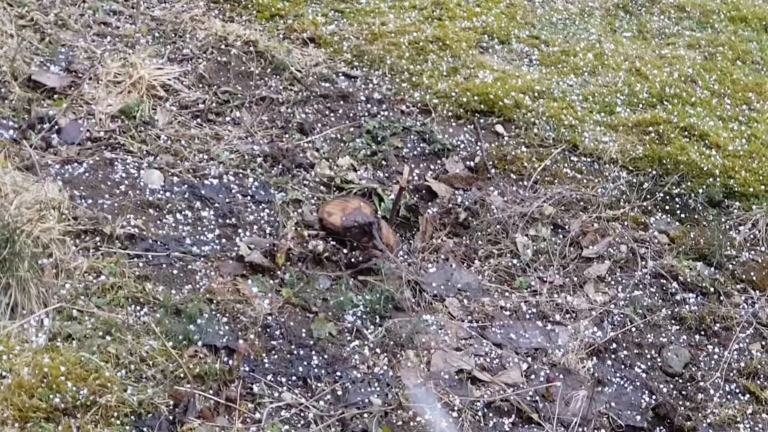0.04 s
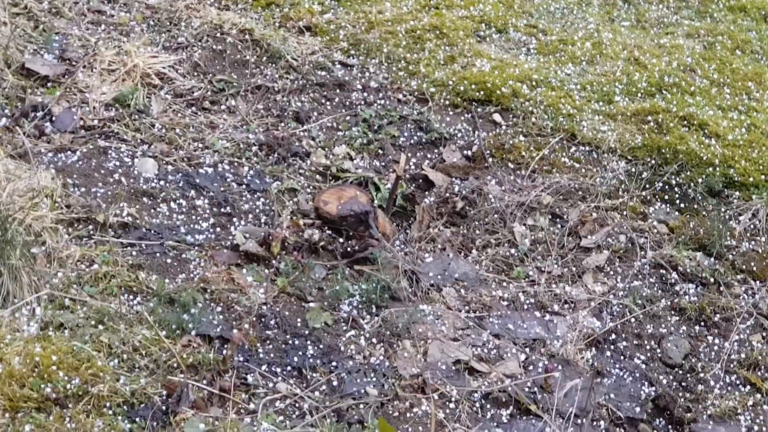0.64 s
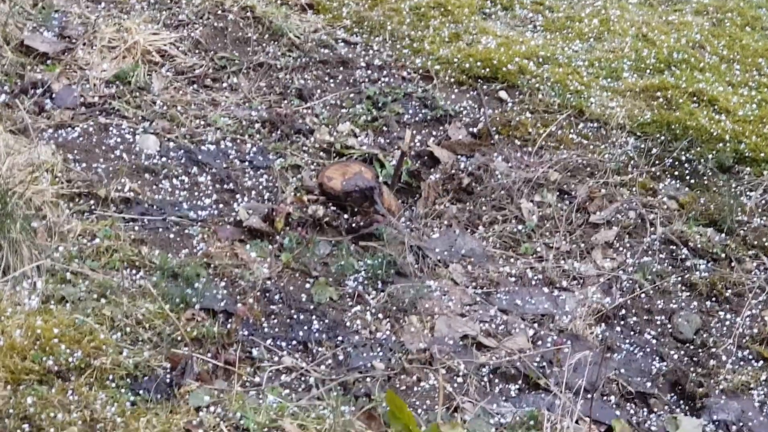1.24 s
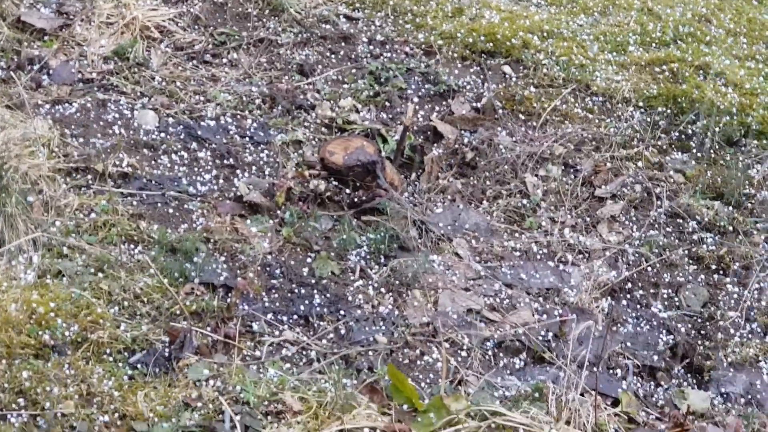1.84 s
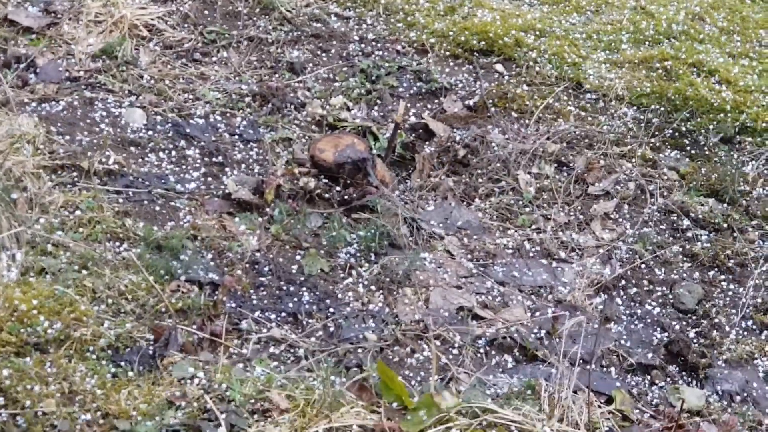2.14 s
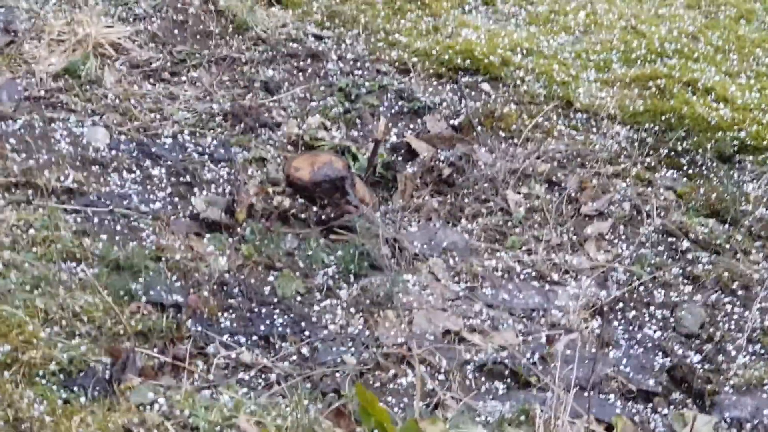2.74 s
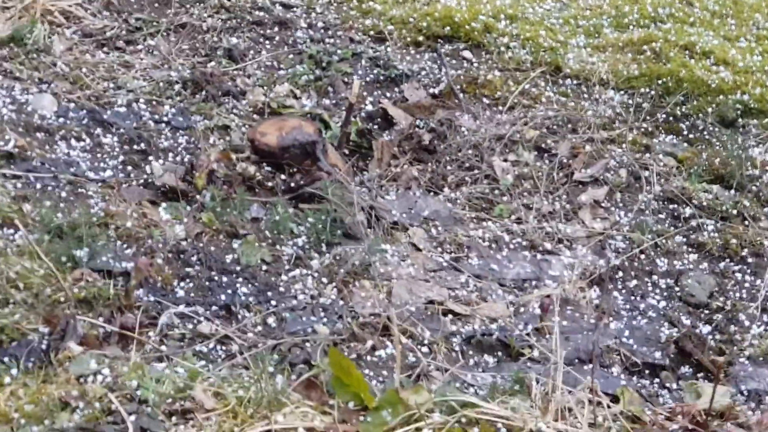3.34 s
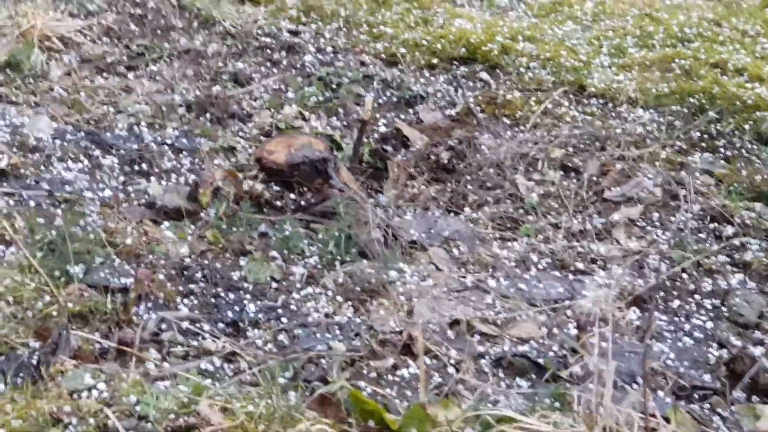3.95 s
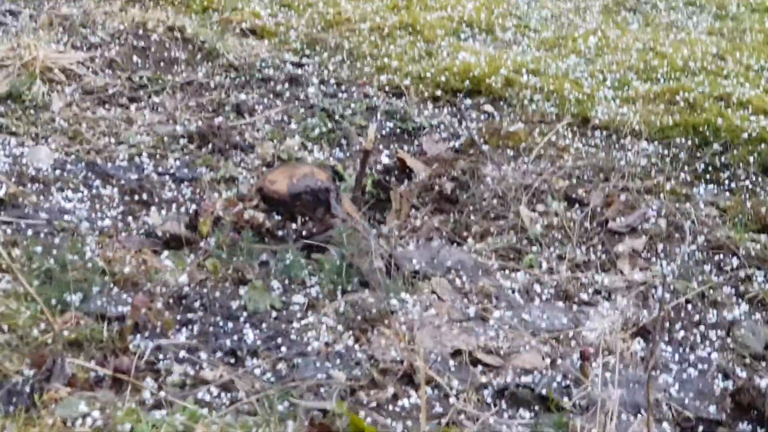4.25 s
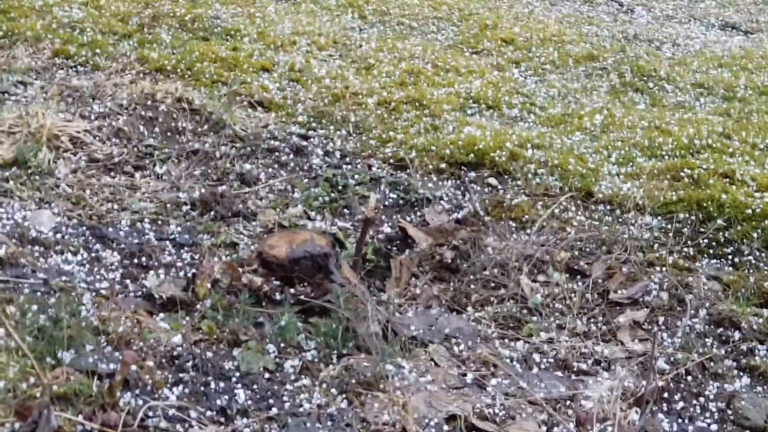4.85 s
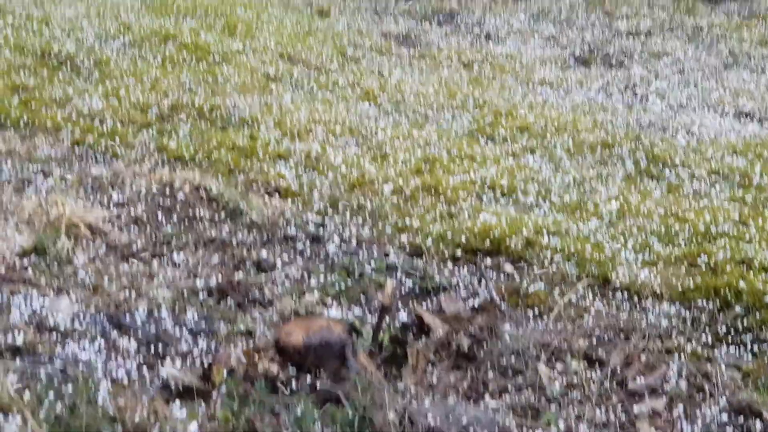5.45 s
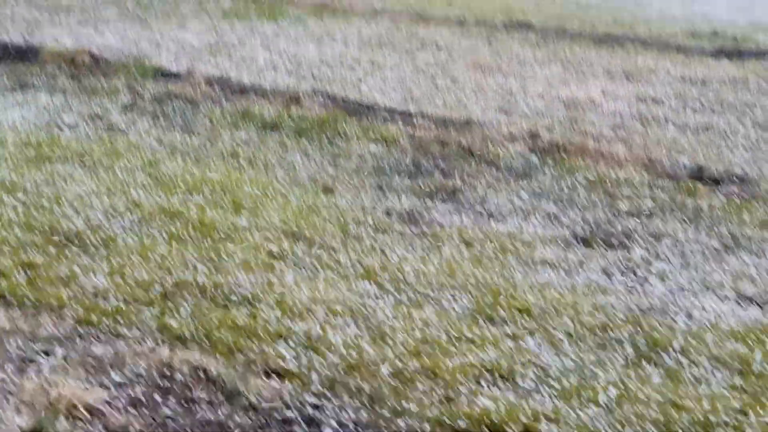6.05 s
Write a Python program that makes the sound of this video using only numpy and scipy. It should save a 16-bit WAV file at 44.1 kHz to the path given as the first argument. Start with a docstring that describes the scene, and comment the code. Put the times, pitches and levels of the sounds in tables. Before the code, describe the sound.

Small hard ice pellets fall outdoors on grass, dead leaves and soil, heard from a hand-held microphone. Nearby ones land with short dry taps and thin high ticks, while distant ones merge into a hiss over a soft, even background wash. The patter starts light, then swells from about 0.8 seconds, with many sharp close hits in surges until 3 seconds. A short low gust rumbles on the microphone around 1.7 seconds. From 3 to about 3.7 seconds a strong gust, the loudest event, buffets the microphone with fluttering, crackling puffs, peaking near 3.3 seconds. A few dry leaves scrape briefly within it, and the patter drops back. A smaller slap of wind follows just after 4 seconds. From about 4.4 seconds the pellets pick up again and keep tapping to the end, with mild wind rumble around 5.5 and 6 seconds.

```python
"""Graupel falls in surges on grass, dead leaves and soil around a hand-held camera.
Each pellet lands with a short dry tap, thuds into the ground, crumbles and hops; the distant ones
merge into a hiss over a soft wash of far surroundings. Gusts buffet the two microphone ports, the
biggest flicks dry leaves over, and the camera's gain control ducks the mix under the strongest."""
import sys
import numpy as np
from scipy import signal
from scipy.fft import rfft, irfft, next_fast_len
from scipy.io import wavfile
from scipy.ndimage import map_coordinates

SR = 44100
rng = np.random.default_rng(int(sys.argv[2]) if len(sys.argv) > 2 else 0)


def digitize_waveform(pressure):
    """Quantize a signal to 16-bit integers and store it at the path in sys.argv[1].

    Rows of a 2-D input are taken as channels; values are limited to [-1, 1].
    """
    field = np.atleast_2d(pressure).T
    bounded = np.clip(field, -1, 1)
    quanta = np.round(bounded * 32767).astype(np.int16)
    wavfile.write(sys.argv[1], SR, quanta)


N = 273861

# Tone of the far surroundings: f/Hz, level/dB
FAR_COLOUR = [(50, -1.5), (400, -3.5), (2100, -3), (2900, -10.5), (4500, -8), (9000, -17), (15000, -11)]
# Dry leaves flicked over by the big gust: t/s, level/dB
LEAF_FLICKS = [(3.301, -25), (3.377, -20.5), (3.425, -22.5), (3.679, -23.5)]
# Tone of their scraping: f/Hz, level/dB
LEAF_COLOUR = [(500, 14.5), (1400, 10.0), (2600, 5.0), (4500, -4.0), (9000, -19.5)]

# Gusts on the ports: peak t/s, rise/s, fall/s, buffet level/dB, flutter level/dB, left over right/dB
GUSTS = [(1.22, 0.19, 0.44, -33, -45.5, -6), (1.71, 0.11, 0.079, -18, -32, 9.5),
         (3.135, 0.091, 0.38, -25, -18, 0), (3.312, 0.079, 0.3, -28, -12, 3.5),
         (4.058, 0.076, 0.097, -39, -23.5, 4), (4.25, 0.041, 0.22, -33.5, -27, 1),
         (5.46, 0.088, 0.37, -32.5, -31.5, 6.5), (6.05, 0.096, 0.43, -36, -38, 4)]
# Separate puffs in and after the big gust: t/s, level/dB
PUFFS = [(3.042, -17), (3.14, -13), (3.183, -13), (3.209, -11), (3.266, -9.5), (3.303, -1.5), (3.346, -5),
         (3.426, -11), (3.475, -9), (3.505, -12), (3.564, -13), (3.635, -7.5), (3.665, -11), (3.936, -20),
         (4.074, -17), (4.217, -19), (4.405, -21)]
# Sharp slaps of wind: t/s, level/dB, f/Hz
SLAPS = [(1.5365, -16.5, 115), (3.295, -5, 537), (3.308, -9, 313), (4.073, -14.5, 645)]
# Tone of the deep eddies, the quick ones and their crackle: f/Hz, level/dB
BUFFET_COLOUR = [(20, -47), (45, -11), (80, -1.5), (140, -2), (220, -9), (400, -53), (900, -57),
                 (2500, -75)]
FLUTTER_COLOUR = [(30, -26), (100, -9), (200, -1.5), (290, 3), (450, -5.5), (700, -14.5), (1200, -40),
                  (4000, -88)]
CRACKLE_COLOUR = [(300, 7.0), (800, 5.5), (2000, -7.0), (3000, -19.5), (6000, -29.5)]

# Strength of the shower, before and after the big gust: t/s, level/dB
SHOWER_BEFORE = [(0.0, -44.5), (0.64, -47), (0.78, -41.5), (1.05, -36.5), (1.25, -34), (1.44, -37.5),
                 (1.86, -38), (1.97, -34), (2.07, -35), (2.15, -40), (2.28, -37.5), (2.42, -34.5),
                 (2.54, -35.5), (2.95, -41.5)]
SHOWER_AFTER = [(3.55, -45), (4.3, -43), (4.38, -35.5), (4.47, -38.5), (5.13, -38.5), (5.43, -41.5),
                (5.65, -38), (5.86, -37.5), (6.01, -37.5), (6.04, -43), (6.21, -37.5)]
# Tone of the distant lawn and of a crumbling pellet: f/Hz, level/dB
HISS_COLOUR = [(30, -24), (85, -40), (250, -12.5), (750, 0.5), (1300, -1.5), (2000, -3.5), (2900, -3.5),
               (4200, -3.5), (7200, -7.5), (9000, -14), (12500, -8.5), (15000, -11)]
CRUNCH_COLOUR = [(100, -11), (400, -8), (2000, -19), (3000, 5), (4500, 2), (7200, 23.5), (9000, 13),
                 (12500, 18), (16000, -79)]
# EQ on the scattered patter and on the close hits: f/Hz, level/dB
PATTER_EQ = [(60, -3), (400, -1), (750, 1), (1300, -6.5), (2000, -1.5), (2900, -3.5), (4400, 5.5),
             (7300, 6), (8800, -8), (10300, -5.5), (12300, -0.5), (15800, -10.5)]
NEAR_EQ = [(80, -9), (300, 1), (700, -4.5)]
# Light pellets ticking on stiff blades close by: t/s, level/dB, f/Hz
BLADE_TICKS = [(1.1012, -7, 12500), (1.2677, -15, 12600), (1.3738, -18, 12500), (2.3645, -9, 12000),
               (4.5206, -15, 12140), (5.5633, -15, 15100)]
# The loudest pellets landing close by: t/s, level/dB, f/Hz
NEAR_PELLETS = [(0.0407, -21, 1360), (0.1485, -21, 4200), (0.7803, -15, 1190), (0.8856, -5, 1620),
                (0.9195, -10, 1620), (0.9416, -14, 1530), (1.0037, -6, 1870), (1.0105, -13, 1960),
                (1.088, -4, 2800), (1.1395, -9, 2210), (1.1585, -11, 1780), (1.245, -6, 2120),
                (1.2502, -9, 2700), (1.2812, -9, 1280), (1.3169, -11, 2040), (1.3274, -13, 1440),
                (1.3861, -13, 2700), (1.5018, -15, 1780), (1.5839, -10, 1360), (1.6603, -13, 1440),
                (1.7871, -7, 1780), (1.8028, -12, 1960), (1.8723, -11, 4400), (2.0036, -13, 1530),
                (2.0451, -9, 1280), (2.0556, -13, 1620), (2.0789, -11, 1960), (2.0855, -8, 3600),
                (2.2991, -13, 1530), (2.3346, -15, 1190), (2.3671, -10, 1960), (2.3987, -9, 1620),
                (2.4173, -11, 1870), (2.443, -9, 2800), (2.4481, -10, 3400), (2.4592, -10, 1620),
                (2.5083, -11, 2040), (2.5717, -13, 2040), (2.6143, -9, 1440), (2.6198, -11, 2120),
                (2.7934, -13, 1360), (2.8761, -14, 2700), (2.8855, -5, 2120), (2.9669, -16, 2120),
                (4.1796, -16, 1870), (4.4033, -13, 1780), (4.5693, -13, 3100), (4.5839, -12, 2700),
                (4.6805, -8, 2800), (4.6845, -7, 3600), (4.8345, -15, 600), (4.8607, -14, 1530),
                (4.9293, -11, 1440), (4.9794, -9, 2800), (5.024, -11, 2120), (5.109, -10, 2120),
                (5.1964, -10, 2120), (5.2534, -15, 1530), (5.6435, -13, 1700), (5.6914, -10, 1870),
                (5.7269, -13, 3000), (5.8215, -12, 2700), (5.8613, -16, 1020), (5.9435, -9, 4000),
                (5.9869, -14, 2040), (6.0111, -13, 3000)]


def amp(db):
    """Decibels to gain."""
    return 10 ** (np.asarray(db) / 20)


def unit(x):
    """Scale to rms 1."""
    return x / np.sqrt(np.mean(x ** 2) + 1e-20)


def curve(rows):
    """One value per sample from rows of t/s, value."""
    return np.interp(np.arange(N) / SR, *np.transpose(rows))


def bell(peak_s, width_s):
    """A bell-shaped swell, down to 1/e at width_s either side of its peak."""
    return np.exp(-((np.arange(N) / SR - peak_s) / width_s) ** 2)


def wobble(rate):
    """A smooth random curve, rate knots a second."""
    return map_coordinates(rng.standard_normal(4096), [np.arange(N) * rate / SR], mode="wrap")


def filtered(x, response):
    """Filter x by a gain given as a function of frequency."""
    padded = next_fast_len(N + SR // 4)
    return irfft(rfft(x, padded) * response(np.fft.rfftfreq(padded, 1 / SR)), padded)[..., :N]


def coloured(x, points):
    """EQ x through points of f/Hz, level/dB, joined on a log axis."""
    f, db = np.transpose(points)
    return filtered(x, lambda hz: amp(np.interp(np.log(hz + 1), np.log(f), db)))


def rush(colour, shared):
    """Stereo noise of rms 1; a share of its power is common to both ports."""
    noise = rng.standard_normal((3, N))
    return unit(coloured(np.sqrt(1 - shared) * noise[:2] + np.sqrt(shared) * noise[2], colour))


def lumps(rate, depth_db):
    """Quick random swells, half shared by the ports and half their own; rms 1."""
    swell = wobble(rate) + np.array([wobble(rate), wobble(rate)])
    return unit(amp(depth_db * np.minimum(swell, 1.6)))


def taps(s, size, hz, lead_ms, life, pan_db=0):
    """Impacts at times s: pressure swings that build for `life` cycles and die, left lead_ms early."""
    step = np.arange(int(6 * np.max(life / hz) * SR) + 2)
    ports = []
    for side in (-1, 1):
        start = (s + side * lead_ms / 2000) * SR
        index = np.ceil(start).astype(int)[:, None] + step
        cycles = hz[:, None] * (index - start[:, None]) / SR
        age = cycles / life
        swing = -np.sin(2 * np.pi * cycles) * (age * np.exp(1 - age)) ** 2
        gain = size * amp(-side * pan_db / 2)
        pressure = gain[:, None] * swing
        ports.append(np.bincount(np.clip(index, 0, N).ravel(), pressure.ravel(), N + 1)[:N])
    return np.array(ports)


def far_wash():
    """The bed: a soft, even rush of the surroundings."""
    return amp(-42.5) * rush(FAR_COLOUR, shared=0.26)


def leaves():
    """Each flick of a dry leaf is a short swell of grainy scraping."""
    swell = sum(amp(db) * bell(s, width_s=0.015) for s, db in LEAF_FLICKS)
    grain = lumps(rate=500, depth_db=3)
    return swell * grain * rush(LEAF_COLOUR, shared=0.61)


def gusts():
    """Envelopes of deep and quick eddies, and their pan in dB: gusts swell and die over a breeze."""
    deep, quick = amp(-51.5) ** 2, amp(-56) ** 2  # power of the breeze
    lean = 0
    for s, rise, fall, deep_db, quick_db, left_db in GUSTS:
        age = np.arange(N) / SR - s
        power = np.exp(-np.where(age < 0, (age / rise) ** 2, 2 * age / fall))
        deep += amp(deep_db) ** 2 * power
        quick += amp(quick_db) ** 2 * power
        lean += left_db * (amp(deep_db) ** 2 + amp(quick_db) ** 2) * power
    return np.sqrt(deep), np.sqrt(quick), lean / (deep + quick)


def wind():
    """Eddies hit each port in lumps: deep buffeting, quick flutter, puffs and a few sharp slaps."""
    deep, quick, left_db = gusts()
    buffet = deep * lumps(rate=29, depth_db=2.8) * rush(BUFFET_COLOUR, shared=0.36)
    puffs = sum(amp(db - 1.5) * bell(s, width_s=0.00976) for s, db in PUFFS)
    eddies = np.hypot(quick * lumps(rate=65, depth_db=2.2), puffs)
    flutter = eddies * rush(FLUTTER_COLOUR, shared=0.38)
    bursts = lumps(rate=120, depth_db=2.2)  # eddies break up at the port's edge
    crackle = amp(-11.5) * bursts * eddies * rush(CRACKLE_COLOUR, shared=0.25)
    s, db, hz = np.transpose(SLAPS)
    slaps = taps(s, amp(db), hz, lead_ms=0, life=0.3)
    lull = amp(-16 * bell(3.612, width_s=0.00976))  # a breath before the big gust's last puffs
    pan = amp(np.array([left_db, -left_db]) / 2)  # the port facing a gust takes most of it
    pan /= np.sqrt(np.mean(pan ** 2, axis=0))
    return (buffet + flutter + crackle + slaps) * lull * pan


def leads(count, side_ms=0.37):
    """Lead of the left port in ms: most pellets are heard from ahead, a few from the sides."""
    return side_ms * rng.uniform(-1, 1, count) * rng.random(count) ** 0.9


def scatter(count, reach, centre_hz, spread):
    """Random landings over a ring of ground, 1 to reach units away: t/s, size, f/Hz, lead/ms."""
    when, area, hardness = rng.random((count, 3)).T
    distance = np.sqrt(1 + area * (reach ** 2 - 1))
    hz = centre_hz * np.exp(spread * (2 * hardness - 1))
    return when * N / SR, 1 / distance, hz, leads(count)


def crunch(s, size, t60):
    """A burst of dying noise at each landing: crumbs of ice and stirred litter."""
    blows = np.bincount(np.clip(s * SR, 0, N).astype(int), size ** 2, N + 1)[:N]
    power = signal.lfilter([1], [1, -amp(-120 / (t60 * SR))], blows)
    return np.sqrt(power) * rush(CRUNCH_COLOUR, shared=1.0)


def landings(s, size, hz, lead_ms, life, thud_db, ring_db, hop_db):
    """Each pellet taps, touches again at once, thuds into the ground, rings a dry leaf and hops."""
    variation = np.clip(rng.standard_normal((len(s), 7)).T, -2, 2)
    pan, thud_pitch, thud_size, flight, leaf_pitch, leaf_size, tumble = variation
    weight = size * np.minimum(1, 4000 / hz)  # the pellets that tick highest are the lightest
    thud_hz, leaf_hz = 640 * np.exp(0.35 * thud_pitch), 2700 * np.exp(0.5 * leaf_pitch)
    touch_s, hop_s = 0.0007 * np.exp(0.5 * tumble), 0.0035 * np.exp(0.5 * flight)
    tap = taps(s, size, hz, lead_ms, life, pan_db=3 * pan)
    touch = taps(s + touch_s, size / 2, hz, lead_ms, life)  # gives each hit its own colour
    thud = taps(s, weight * amp(thud_db + 2 * thud_size), thud_hz, lead_ms, life=0.42)
    ring = taps(s, weight * amp(ring_db + 3 * leaf_size), leaf_hz, lead_ms, life=2.2)
    hop = taps(s + hop_s, size * amp(hop_db), hz, lead_ms / 2, life)
    return tap + touch + thud + ring + hop


def lawn_ticks():
    """Fine, bright ticks of pellets on blades and dry leaves across the lawn; rms 1."""
    s, size, hz, lead_ms = scatter(count=850, reach=5, centre_hz=11800, spread=0.28)
    return unit(coloured(taps(s, size, hz, lead_ms, life=1), PATTER_EQ))


def soil_patter():
    """The body of the shower: pellets landing and crumbling on the soil all around; rms 1."""
    s, size, hz, lead_ms = scatter(count=850, reach=2.9, centre_hz=2100, spread=0.85)
    hits = landings(s, size, hz, lead_ms, life=0.46, thud_db=-11, ring_db=-16, hop_db=-8)
    return unit(coloured(hits, PATTER_EQ) + crunch(s, size * amp(-22), t60=0.011))


def shower():
    """Patter, ticks and the hiss of distant pellets ride one surge curve; the patter swells most."""
    usual_db = -38
    surge_db = curve([*SHOWER_BEFORE, *SHOWER_AFTER]) - usual_db
    patter = amp(-34.5 + 1.18 * surge_db) * soil_patter()
    ticks = amp(-44 + surge_db) * lawn_ticks()
    hiss = amp(-36 + surge_db) * rush(HISS_COLOUR, shared=0.22)
    # the pellets arrive in small flurries, which distance evens out
    flurries = amp(1.3 * np.minimum(wobble(rate=32), 1))
    return flurries * (patter + ticks) + np.sqrt(flurries) * hiss


def blade_ticks():
    """Light pellets strike stiff blades close by: thin, very high ticks, dead centre."""
    s, db, hz = np.transpose(BLADE_TICKS)
    return taps(s, amp(db), hz, lead_ms=0, life=1.2)


def near_pellets(snap_hz=4300):
    """Single pellets snap down within arm's reach and stir the litter, all too light for bass."""
    s, db, hz = np.transpose(NEAR_PELLETS)
    size, lead_ms = amp(db), 0.67 * leads(len(s))
    hits = landings(s, size, hz, lead_ms, life=0.46, thud_db=-15, ring_db=-20, hop_db=-14)
    snap_s = s + (1 / hz - 1 / snap_hz) / 2  # the steep middle of the tap's swing
    snaps = taps(snap_s, size * amp(-10), np.full(len(s), snap_hz), lead_ms, life=0.45)
    crumbs = crunch(s, size * amp(-29), t60=0.014)
    litter = crunch(s, size * amp(-41), t60=0.07)
    return coloured(hits, NEAR_EQ) + snaps + crumbs + litter


def scene():
    """The dry mix: pellets near and far, the bed, the wind and the leaves that it stirs."""
    return near_pellets() + blade_ticks() + shower() + far_wash() + wind() + leaves()


def record(dry):
    """The camera ducks its gain as the recent power rises, and cuts all above its band limit."""
    knee_db, duck_db_per_db, memory_s, top_hz = -20, 0.47, 0.12, 16000
    keep = np.exp(-1 / (memory_s * SR))
    power = signal.lfilter([1 - keep], [1, -keep], np.mean(dry ** 2, axis=0))
    gain = (1 + power / amp(knee_db) ** 2) ** (-duck_db_per_db / 2)
    return filtered(gain * dry, lambda hz: hz < top_hz)


dry = scene()
out = record(dry)
digitize_waveform(out)
```